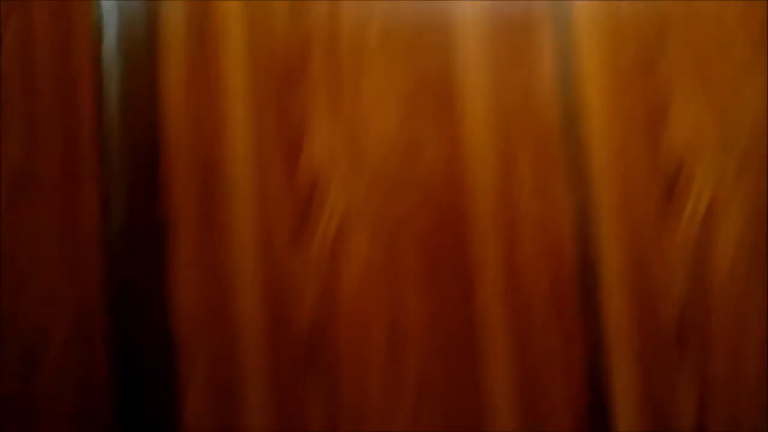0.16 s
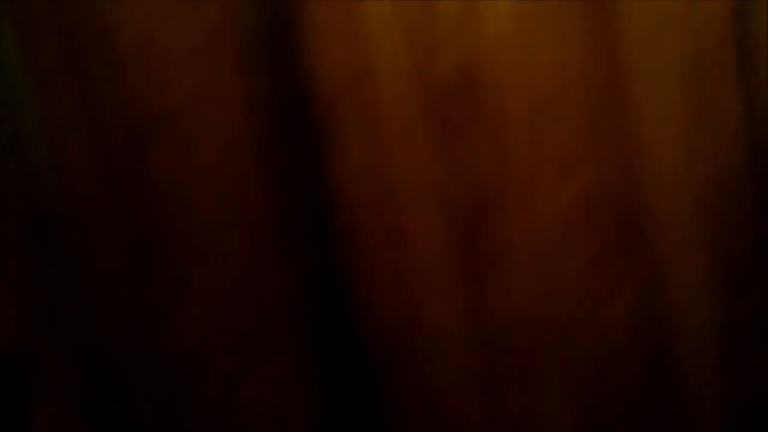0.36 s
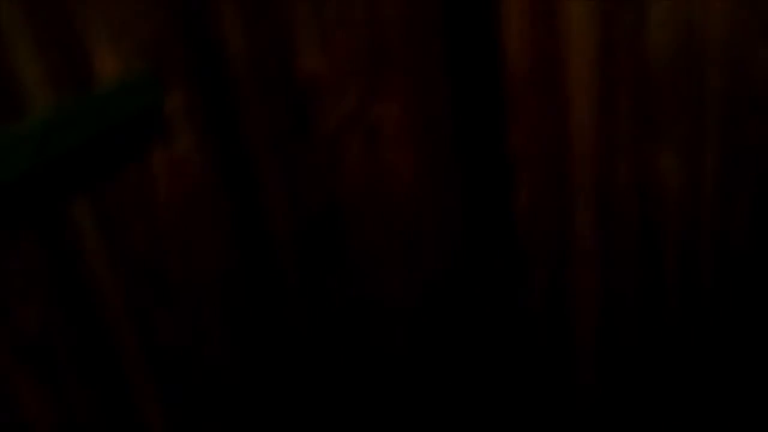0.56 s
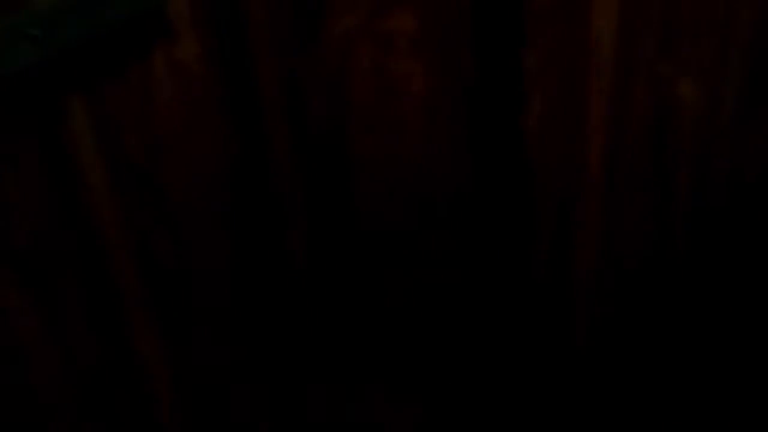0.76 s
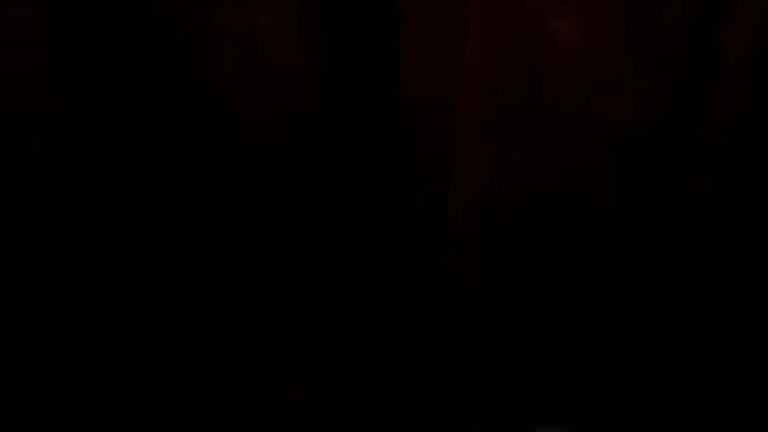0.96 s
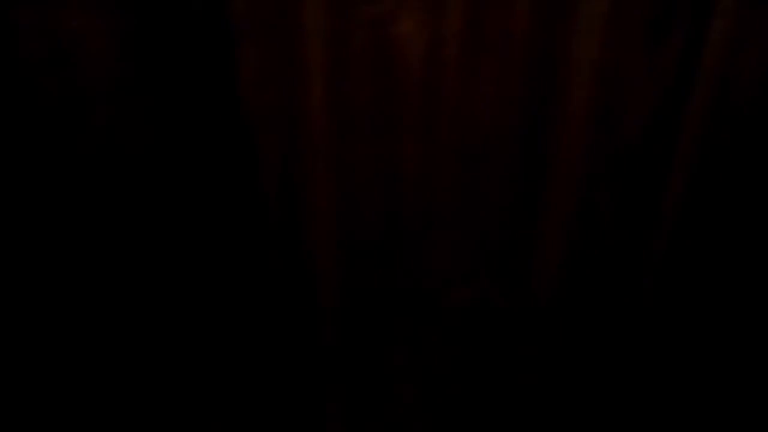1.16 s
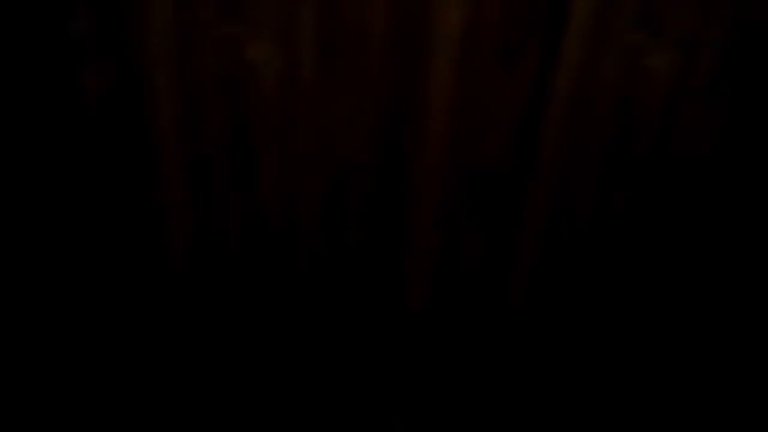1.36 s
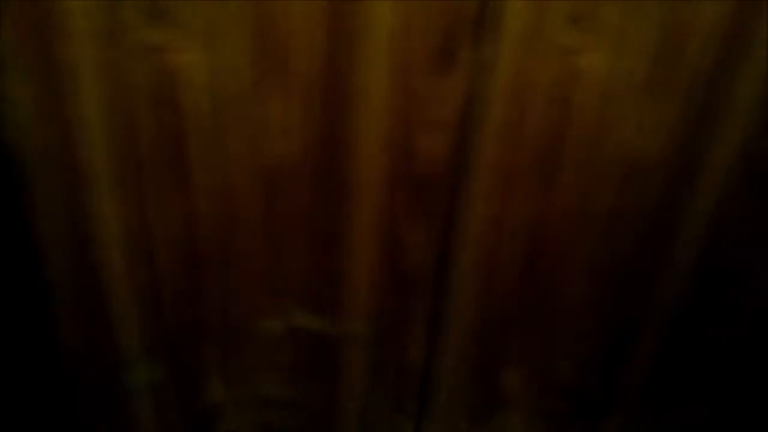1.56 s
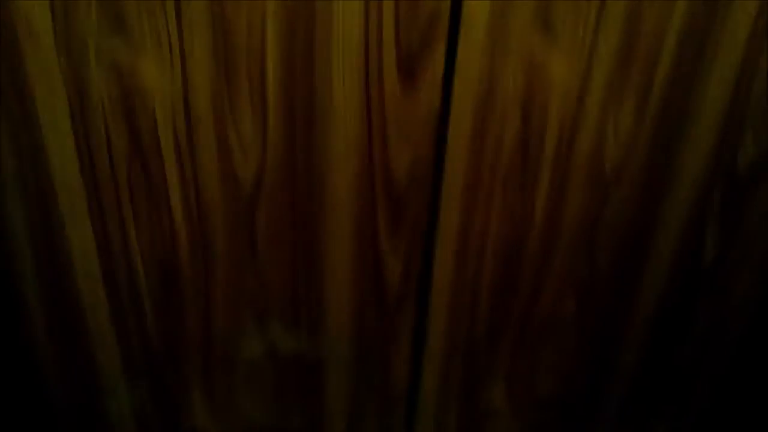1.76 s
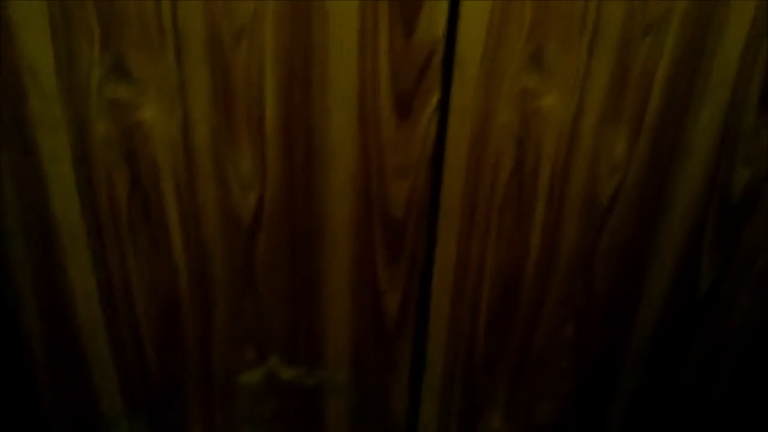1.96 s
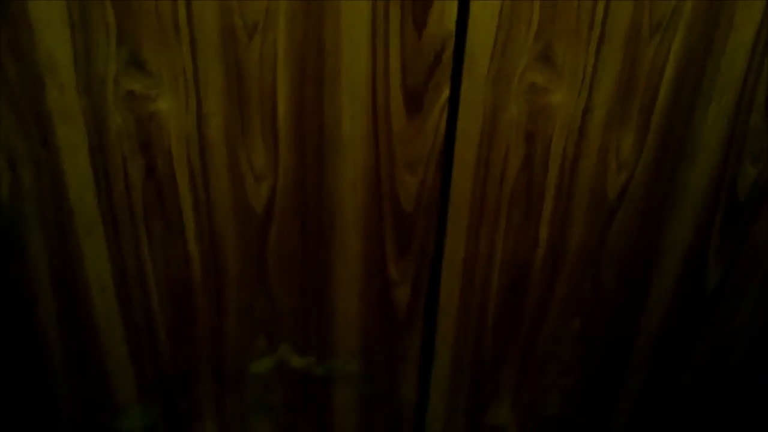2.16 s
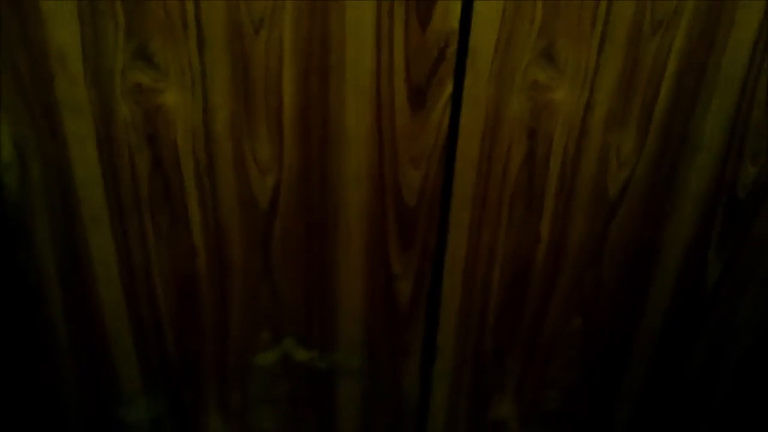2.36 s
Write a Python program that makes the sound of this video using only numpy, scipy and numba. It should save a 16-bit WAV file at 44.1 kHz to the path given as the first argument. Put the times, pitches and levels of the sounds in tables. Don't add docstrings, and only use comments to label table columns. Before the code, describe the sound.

An old wooden lift door gives a sharp hollow knock, slides hissing and scuffing along its rail, then clacks against a metal latch with a low rattling thud; close microphone in a small cabin, faint hum.

```python
import sys
import numpy as np
from scipy import signal
from scipy.fft import rfft, irfft
from scipy.io import wavfile
from scipy.ndimage import uniform_filter1d
from numba import njit

SR = 44100
rng = np.random.default_rng(int(sys.argv[2]) if len(sys.argv) > 2 else 0)


def volts_from_decibels(level):
    exponent = np.asarray(level, float) / 20
    return 10 ** exponent


def wav_out(sig):
    wavfile.write(sys.argv[1], SR, np.round(np.clip(np.atleast_2d(sig).T, -1, 1) * 32767).astype(np.int16))


N = 110250

# start_s, hiss_db, treble_tilt_db_per_octave, airy_edge_db
DOOR_SLIDE = [(.03, -66.5, 9.5, -70), (.12, -53, -2, -99), (.2, -58, -1, -87), (.27, -46, -5, -74),
              (.34, -51, -1, -82), (.4, -48.5, -0.5, -68.5), (.47, -49, 1, -75), (.57, -49.5, 4.5, -70),
              (.65, -47.5, 3, -75), (.72, -50, 5.5, -76), (.8, -51.5, 2.5, -84), (.89, -49.5, 1, -81),
              (.98, -58, -1, -105), (1.04, -57, -5, -78), (1.11, -56, 3.5, -70), (1.16, -54.5, -5.5, -85),
              (1.32, -57.5, -2, -96), (1.42, -67, -13.5, -94)]
# pitch_hz, width_hz, level_db
RAIL_RESONANCES = [(1473, 420, 4.5), (2175, 210, 7.5), (2830, 860, 2), (4400, 520, 0), (6070, 480, -1.5)]
# pitch_hz, level_db_per_hz
RAIL_WASH = [(410, -6.5), (800, -10), (1430, -3), (2900, 0), (3400, -16.5), (5870, -8.5), (8200, -59),
             (10800, -38), (15000, -42)]
# pitch_hz, width_hz, level_db
AIRY_EDGE = [(9700, 1600, 1), (11370, 900, 2)]
# start_s, level_db, pitch_hz
SHOE_SCUFF = [(.05, -73, 600), (.13, -53, 630), (.21, -76, 500), (.33, -50, 800), (.46, -77, 600),
              (.52, -56.5, 540), (.59, -50.5, 490), (.65, -55, 634), (.73, -50.5, 600), (.78, -60, 600),
              (.86, -56, 600), (1.0, -103, 600), (1.055, -60.5, 800), (1.085, -46.5, 680),
              (1.125, -42.5, 580), (1.14, -46.5, 627), (1.23, -53, 475), (1.3, -63.5, 457)]
# start_s, level_db, pitch_hz
ROLLER_SONG = [(.255, -65, 4160), (.34, -54, 4120), (.37, -82, 3000), (.41, -56, 2200), (.55, -65, 2400),
               (.66, -64, 2320), (.76, -59.5, 2650), (.83, -54, 2560), (.89, -53, 2580), (.94, -58, 2500),
               (1.0, -56.5, 2020), (1.07, -70, 2120), (1.15, -51.5, 2200), (1.22, -65, 2250),
               (1.27, -53, 2280), (1.3, -85, 2870), (1.34, -61, 3400), (1.4, -92, 3400)]
# start_s, body_db, tick_db, panel_db
KNOCKS = [
    (0.092, -38, -61, -47.5),
    (.229, -26.5, -61, -55),
    (0.2466, -4.5, -8, -30),
    (0.2647, -37, -68, -26.5),
    (.281, -37, -55, -31.5),
    (.31, -69, -60, -40.5),
    (1.77, -61, -53, -82),
    (2.202, -72, -75, -47),
    (2.212, -64, -70, -57),
]
# pitch_hz, level_db, t60_s
TICK_MODES = [(1480, -4, 0.016), (2250, 1, 0.008), (3560, -13, 0.0037), (4300, -11.5, 0.0094),
              (7050, -6.5, 0.0018), (12000, -14, .004)]
# pitch_hz, level_db, t60_s
PANEL_MODES = [(122, -23, 0.2), (200, -6, 0.097), (246, -13.5, 0.11), (270, 1, 0.076), (307, 0.5, 0.065)]
# start_s, latch_db, leaf_db, cabin_db
CLOSING_CONTACTS = [(1.4262, -23.5, -33.5, -61), (1.4355, -29, -46, -58), (1.439, -47, -23, -55),
                    (1.4463, -28.5, -27, -57), (1.483, -36, -24, -38), (1.519, -40, -33, -42),
                    (1.532, -30, -37, -24.5), (1.548, -33.5, -24.5, -20.5), (1.583, -41, -36, -21),
                    (1.605, -52, -28, -33.5), (1.64, -52.5, -34, -30.5), (1.658, -51, -60, -38.5)]
# pitch_hz, level_db, t60_s
LATCH_MODES = [(855, -3, 0.18), (904, 0.5, 0.15), (988.5, 1, 0.17), (1308, 3.5, 0.074), (1190, -18, .15),
               (1357, -2, 0.14), (2690, -16, 0.028), (1510, 1.5, 0.085), (1980, -0.5, 0.14),
               (2050, 5.5, 0.066), (3430, -7, 0.13), (4850, -14, 0.038), (5420, -18, 0.044),
               (6100, -19, 0.063)]
# pitch_hz, level_db, t60_s
LEAF_MODES = [(233.4, 0, 0.12), (284.6, -4, 0.19), (421, -11.5, 0.18), (504, -16, 0.12), (554, -15.5, 0.16),
              (673, -22, .15)]
# pitch_hz, level_db, t60_s
CABIN_MODES = [(40, -25, .2), (68.6, -16, 0.28), (94, -8.5, 0.24), (145, -2.5, 0.18), (189.2, -5.5, 0.27),
               (248, -5, 0.14), (305, -1.5, 0.14), (394, -23, 0.072), (451, -22, 0.079)]
# pitch_hz, level_db, t60_s
SPRING_MODES = [(5800, -6, .06), (8460, 1, .015), (11900, -3, 0.045)]
# pitch_hz, level_db_per_hz
RATTLE_COLOUR = [(100, -27), (264, -3.5), (693, -17.5), (1340, -13.5), (2950, -25), (5280, -29),
                 (8500, -48.5), (12000, -34), (14000, -61)]
# pitch_hz, level_db, t60_s
CATCH_MODES = [(1490, -1.5, 0.0079), (2250, -1, 0.02), (3440, -4.5, 0.011), (4520, -9, 0.0086),
               (6560, -14, .005)]
# pitch_hz, level_db, t60_s
SNAP_MODES = [(600, -4, 0.0064), (1600, 5.5, .003), (3680, -2, 0.0034), (6000, -18, 0.0017)]
# start_s, level_db
SHUDDERS = [(.308, -52), (.328, -49), (.345, -39), (.369, -40), (.408, -43), (0.429, -44), (0.445, -46),
            (.475, -55)]
# pitch_hz, level_db, t60_s
HANGER_MODES = [(137, -8, 0.13), (201, -4, 0.083), (250, 0.5, 0.11), (277, -5.5, 0.11)]
# start_s, level_db
PLATE_CLASHES = [
    (1.4257, -48),
    (1.432, -39),
    (1.458, -46),
    (1.486, -53.5),
]
# pitch_hz, level_db, t60_s
PLATE_MODES = [(3305, 0, 0.042), (4750, -5, .05), (5360, 2, 0.032), (5960, -2, 0.053), (6080, -11, 0.034)]
# start_s, level_db, pitch_hz, t60_s
LOOSE_PARTS = [
    (1.429, -33, 908, .25),
    (1.434, -36, 966, .15),
    (1.5481, -21, 299, 0.073),
    (1.5823, -27.5, 285, .1),
    (1.638, -31, 270, .07),
    (1.517, -40, 1600, 0.11),
    (1.545, -51.5, 5800, .08),
    (1.576, -45, 1600, 0.13),
    (1.705, -38, 145, 0.3),
]
# start_s, level_db
CREEP_LEVEL = [(1.765, -92), (1.771, -60), (1.83, -61.5), (1.87, -66.5), (2.0, -64.5), (2.1, -64),
               (2.2, -69), (2.5, -67)]
# pitch_hz, width_hz, level_db
CREEP_RESONANCES = [(1450, 410, 7), (2500, 1060, 2)]
# pitch_hz, level_db_per_hz
VENTILATION = [(25, -12.5), (60, -4.5), (120, -6), (247, -6.5), (525, -15.5), (2500, -26), (5000, -34.5),
               (8000, -41), (15000, -44.5)]
# start_s, level_db
RUMBLE_SWELL = [(0, -43.5), (.06, -56.5), (.2, -51), (.3, -43.5), (.45, -61.5), (.52, -56.5), (1.0, -66.5),
                (1.2, -56.5), (1.38, -55.5), (1.75, -57.5), (1.95, -56.5), (2.15, -68.5), (2.27, -55.5),
                (2.34, -86), (2.44, -52), (2.5, -90)]
# pitch_hz, width_hz, level_db
SHAFT_RESONANCES = [(125, 44.4, -1), (264, 89.5, -0.5), (331, 58, -3), (386, 21, -5)]
# pitch_hz, level_db
WHINE = [(12349, -99)]
# pitch_hz, level_db
MIC_TREBLE = [(6900, -0.5), (7500, -8), (8200, -9)]
# centre_s, level_db
TREBLE_SAGS = [(.16, -15), (.352, -11), (.458, -17), (.65, -15), (.948, -3), (1.312, -2), (1.715, -8),
               (1.8, -8)]

TIME_S = np.arange(N) / SR
SCATTER_DB = 2.5


def rms_one(x):
    return x / np.sqrt(np.mean(x ** 2) + 1e-20)


def in_time(rows):
    s, *columns = np.transpose(rows)
    return [np.interp(TIME_S, s, column) for column in columns]


def low_pass(x, order, hz):
    return signal.sosfilt(signal.butter(order, hz, fs=SR, output="sos"), x)


def high_pass(x, order, hz):
    return signal.sosfilt(signal.butter(order, hz, "high", fs=SR, output="sos"), x)


def drift(rate_hz):
    r = np.exp(-80 * np.pi * rate_hz / SR)
    noise = rng.standard_normal(N // 40 + 2002)
    slow = signal.lfilter([1], [1, -2 * r, r * r], noise)[2000:]
    return np.interp(np.arange(N) / 40, np.arange(len(slow)), rms_one(slow - slow.mean()))


def strikes(s, db):
    clicks = np.full(N, 1e-18)
    clicks[(np.asarray(s) * SR).astype(int)] = volts_from_decibels(np.asarray(db))
    return clicks


def ring(clicks, hz, t60_s):
    r = np.exp(-np.log(1000) / (t60_s * SR))
    w = 2 * np.pi * hz / SR
    return signal.lfilter([0, np.sin(w)], [1, -2 * r * np.cos(w), r * r], clicks)


def struck(s, db, modes, scatter_db):
    luck_db = scatter_db * rng.standard_normal((len(s), len(modes)))
    rung = 0
    for k, (hz, level_db, t60_s) in enumerate(modes):
        rung = rung + (-1) ** k * ring(strikes(s, db + level_db + luck_db[:, k]), hz, t60_s)
    return rung


def shaken(s, db, modes):
    chatter_t60_s = 0.041
    fall = np.exp(-np.log(1000) / (chatter_t60_s * SR))
    burst = signal.lfilter([1], [1, -fall], strikes(s, db)) * np.sqrt(1 - fall ** 2)
    return sum(volts_from_decibels(level_db) * ring(burst * rng.standard_normal(N), hz, t60_s)
               for hz, level_db, t60_s in modes)


def resonant(x, peaks):
    return sum((-1) ** k * volts_from_decibels(db) * signal.lfilter(*signal.iirpeak(hz, hz / width_hz, SR), x)
               for k, (hz, width_hz, db) in enumerate(peaks))


def bands(spectrum):
    edges = 22 * 2 ** np.arange(0, 9.6, 1 / 3)
    edges = edges[edges > spectrum[0][0] * .7]
    mids = np.sqrt(edges[1:] * edges[:-1])
    white = rng.standard_normal((2, N))
    hz, db = np.transpose(spectrum)
    parts = []
    for k, mid in enumerate(mids):
        band = signal.butter(2, edges[k:k + 2], "band", fs=SR, output="sos")
        level = volts_from_decibels(np.interp(np.log(mid), np.log(hz), db))
        parts.append(level * signal.sosfilt(band, white[k % 2]))
    parts = np.array(parts)
    return mids, parts / np.std(parts.sum(axis=0))


def patchy(spectrum, patchy_db, rate_hz, tilt_db=0):
    mids, parts = bands(spectrum)
    together = drift(rate_hz)
    noise = 0
    for hz, part in zip(mids, parts):
        flicker_db = patchy_db * (.5 * together + drift(rate_hz))
        octaves = np.log2(max(hz, 700) / 2200)
        noise = noise + part * volts_from_decibels(flicker_db + tilt_db * octaves)
    return noise


def friction():
    grains_per_s, spread_db = 5400, 2
    size_db = spread_db * np.minimum(rng.exponential(1, N), 5)
    return volts_from_decibels(size_db) * rng.choice([-1, 1], N) * (rng.random(N) < grains_per_s / SR)


@njit
def moving_peak(x, hz, r, step):
    y = np.zeros(len(x))
    for i in range(2, len(x)):
        y[i] = x[i] - x[i - 2] + 2 * r * np.cos(step * hz[i]) * y[i - 1] - r * r * y[i - 2]
    return y


def wandering_friction(hz, width_hz):
    r, step = np.exp(-np.pi * width_hz / SR), 2 * np.pi / SR
    return moving_peak(moving_peak(friction(), hz, r, step), hz, r, step)


def knocks():
    s, body_db, tick_db, panel_db = np.transpose(KNOCKS)
    push = signal.lfilter(np.hanning(30) / 13.2, 1, strikes(s - .0003, body_db + 4.5))
    body = high_pass(ring(push, hz=466, t60_s=0.011), 2, 360)
    tick = low_pass(struck(s, tick_db - 8, TICK_MODES, 0.85), 1, 4830)
    return tick + struck(s, panel_db, PANEL_MODES, SCATTER_DB) - body


def rattle(s, latch_db):
    level_db, rise_s, t60_at_1khz_s, t60_slope = -5.5, 0.0093, 0.26, -0.62
    rise = np.exp(-1 / (rise_s * SR))
    power = signal.lfilter([1 - rise], [1, -rise], strikes(s, 2 * latch_db))
    noise = 0
    for hz, part in zip(*bands(RATTLE_COLOUR)):
        t60_s = t60_at_1khz_s * (hz / 1000) ** t60_slope
        fall = np.exp(-2 * np.log(1000) / (t60_s * SR))
        noise = noise + part * np.sqrt(signal.lfilter([1], [1, -fall], power))
    return volts_from_decibels(level_db) * noise


def closing():
    s, latch_db, leaf_db, cabin_db = np.transpose(CLOSING_CONTACTS)
    latch = shaken(s, latch_db - 14.5, LATCH_MODES)
    spring = shaken([1.528], -45, SPRING_MODES)
    leaf = struck(s, leaf_db, LEAF_MODES, SCATTER_DB)
    thud = low_pass(struck(s, cabin_db, CABIN_MODES, SCATTER_DB), 2, 500)
    return low_pass(latch + spring + leaf + thud + rattle(s, latch_db), 1, 9000)


def slide():
    hiss_db, tilt_db, air_db = in_time(DOOR_SLIDE)
    scuff_db, scuff_hz = in_time(SHOE_SCUFF)
    moving = np.interp(TIME_S, [.02, .06, 1.42, 1.5], [0, 1, 1, 0])
    flutter_db = 1.5 * drift(20)
    rail = rms_one(resonant(resonant(friction(), RAIL_RESONANCES), RAIL_RESONANCES))
    rail = volts_from_decibels(-1.5 + flutter_db) * rail + patchy(RAIL_WASH, 3.23, 4.7, tilt_db)
    air = rms_one(resonant(resonant(rng.standard_normal(N), AIRY_EDGE), AIRY_EDGE))
    scuff = rms_one(wandering_friction(scuff_hz, width_hz=427))
    scuff = volts_from_decibels(scuff_db + 0.54 * drift(26)) * scuff
    return moving * (volts_from_decibels(hiss_db - 3) * rail + volts_from_decibels(air_db) * air + scuff)


def roller():
    level_db, hz = in_time(ROLLER_SONG)
    sung = wandering_friction(hz, width_hz=490)
    return volts_from_decibels(level_db) * sung / np.sqrt(uniform_filter1d(sung ** 2, size=4000))


def small_parts():
    snap = sum(ring(strikes([2.2162], -47.5 + level_db), hz, t60_s) for hz, level_db, t60_s in SNAP_MODES)
    loose = sum(ring(strikes([at_s], level_db), hz, t60_s) for at_s, level_db, hz, t60_s in LOOSE_PARTS)
    plate = shaken(*np.transpose(PLATE_CLASHES), PLATE_MODES)
    s, db = np.transpose(SHUDDERS)
    hangers = struck(s, db, HANGER_MODES, SCATTER_DB)
    catch = struck([.0917], -32, CATCH_MODES, 0)
    return loose + plate + hangers + low_pass(catch - snap, 2, 6500)


def creep():
    return volts_from_decibels(in_time(CREEP_LEVEL)[0]) * rms_one(resonant(friction(), CREEP_RESONANCES))


def hum():
    swell_db, = in_time(RUMBLE_SWELL)
    rumble_level = volts_from_decibels(swell_db + 2.0 * drift(5.4))
    rumble = rumble_level * rms_one(resonant(rng.standard_normal(N), SHAFT_RESONANCES))
    return volts_from_decibels(-58.5) * patchy(VENTILATION, 0.86, 10) + rumble


def electrical_whine():
    (hz, db), = WHINE
    return volts_from_decibels(db + 10.0 + 1.5 * drift(6)) * np.sin(2 * np.pi * hz * TIME_S)


def scene():
    return (knocks() + closing() + slide() + hum() + creep() + roller() + small_parts())[None]


def microphone(dry):
    dry = high_pass(dry, 2, 40)
    hz = np.arange(N // 2 + 1) * SR / N
    return irfft(rfft(dry) * volts_from_decibels(np.interp(hz, *np.transpose(MIC_TREBLE))), N)


def sag_treble(x):
    half_s, from_hz = 0.01, 7500
    sag_db = sum(db * np.clip(1.5 - abs(TIME_S - s) / half_s, 0, 1) for s, db in TREBLE_SAGS)
    treble = signal.sosfiltfilt(signal.butter(2, from_hz, "high", fs=SR, output="sos"), x)
    return x - treble * (1 - volts_from_decibels(sag_db))


def top_cut(x):
    return signal.sosfilt(signal.butter(12, 15500, fs=SR, output="sos"), x)


def record(dry):
    mix = sag_treble(microphone(dry) + electrical_whine())
    return top_cut(mix)


dry = scene()
out = record(dry)
wav_out(out)
```